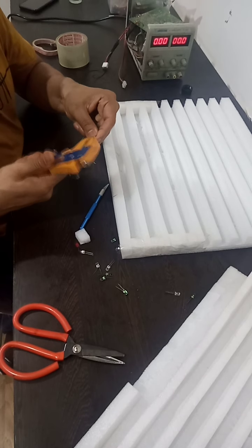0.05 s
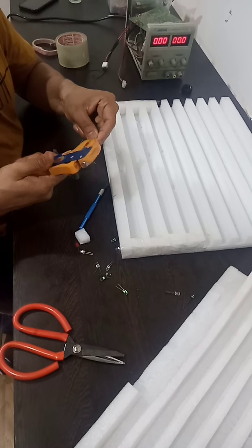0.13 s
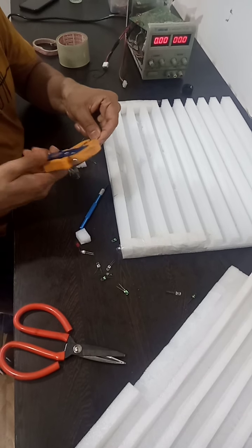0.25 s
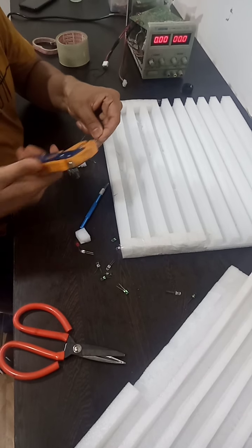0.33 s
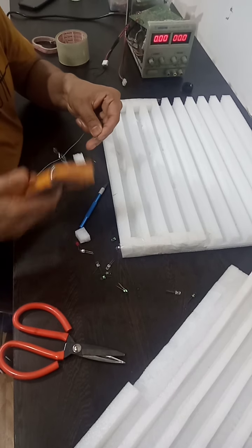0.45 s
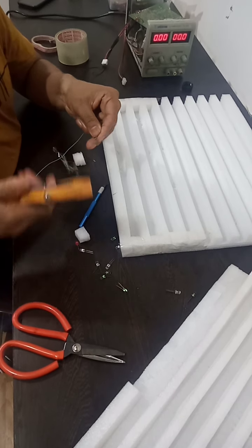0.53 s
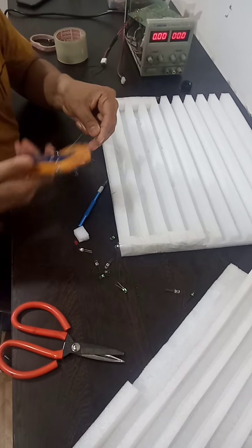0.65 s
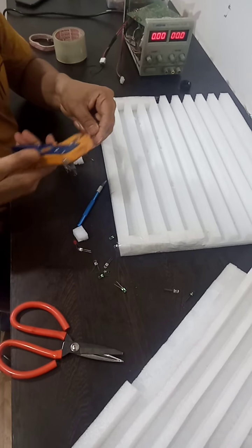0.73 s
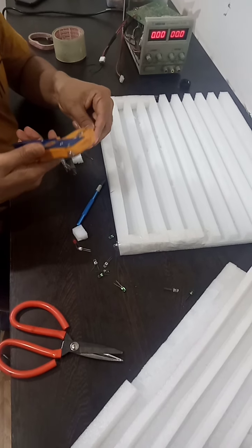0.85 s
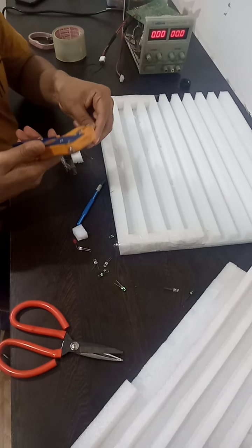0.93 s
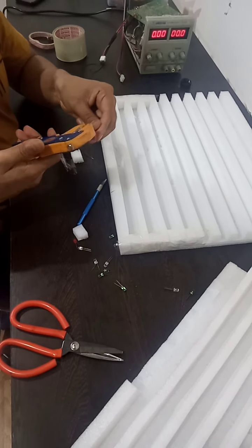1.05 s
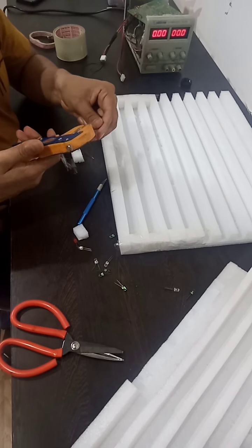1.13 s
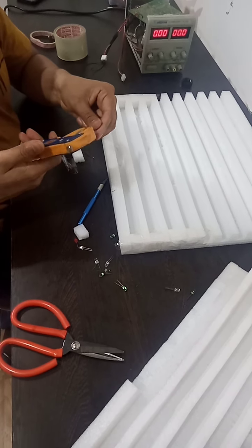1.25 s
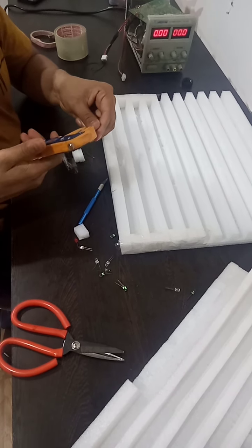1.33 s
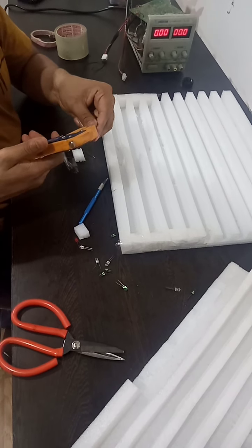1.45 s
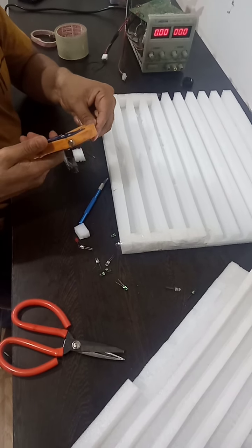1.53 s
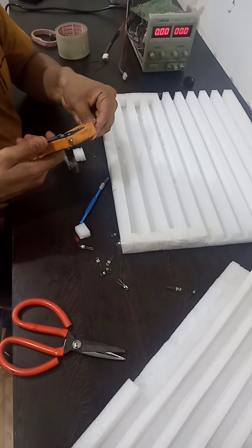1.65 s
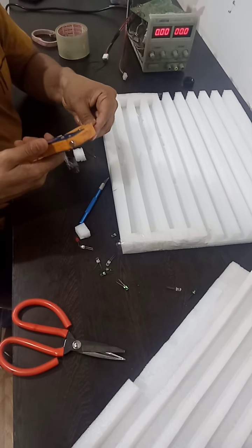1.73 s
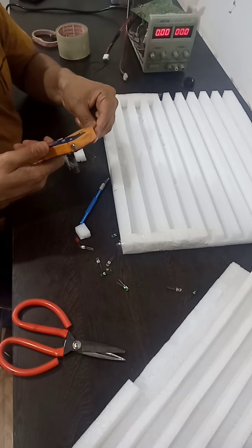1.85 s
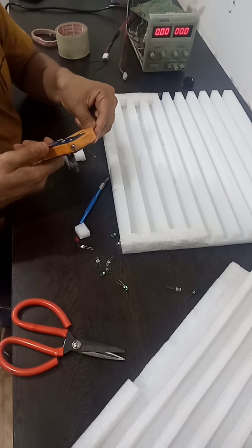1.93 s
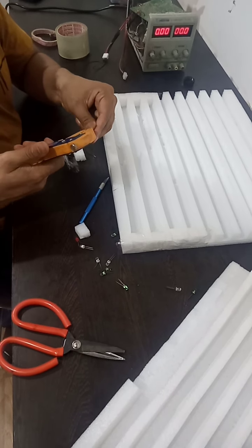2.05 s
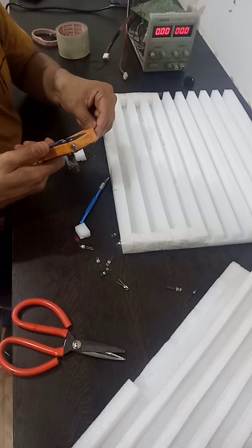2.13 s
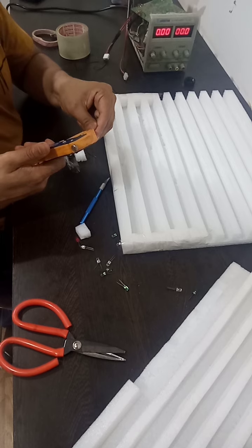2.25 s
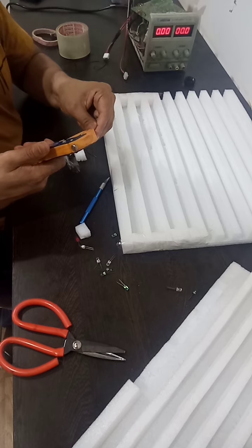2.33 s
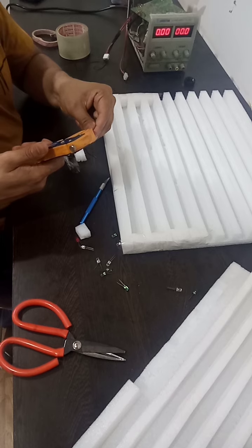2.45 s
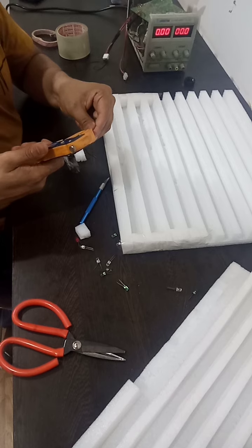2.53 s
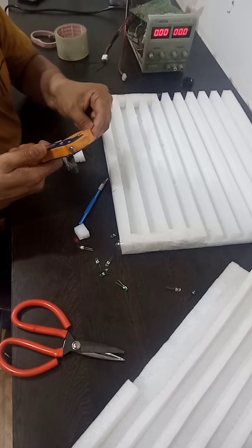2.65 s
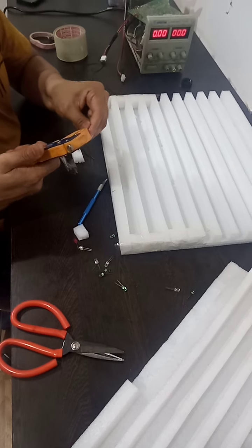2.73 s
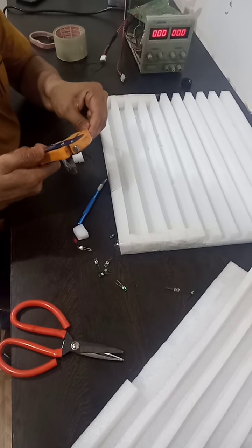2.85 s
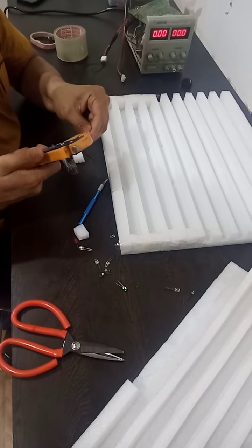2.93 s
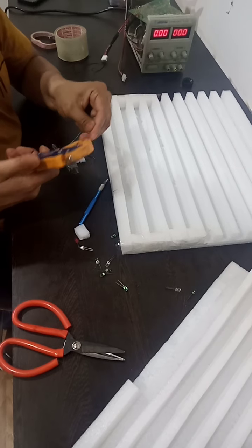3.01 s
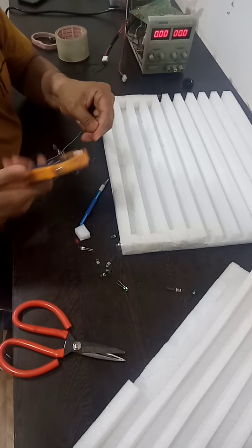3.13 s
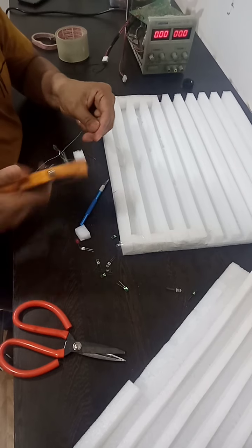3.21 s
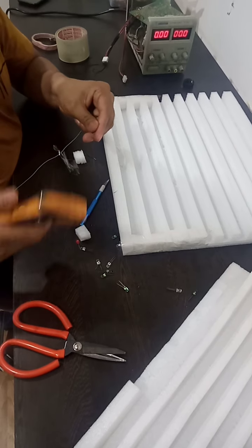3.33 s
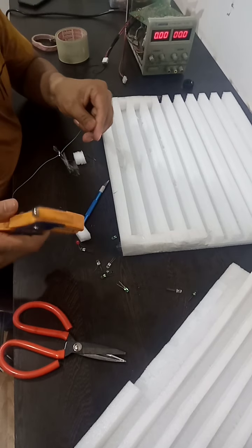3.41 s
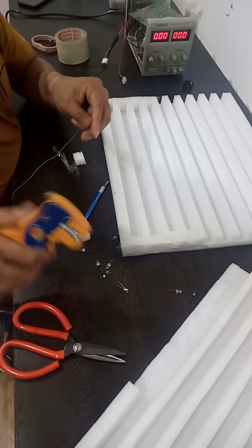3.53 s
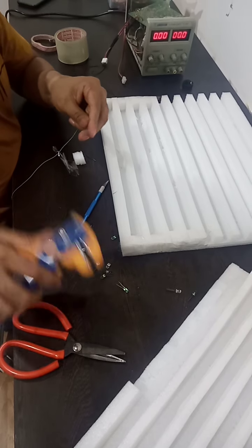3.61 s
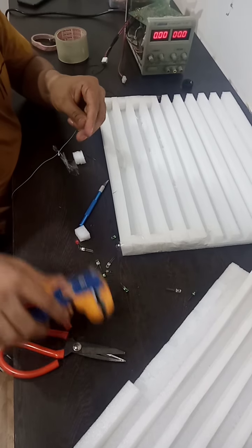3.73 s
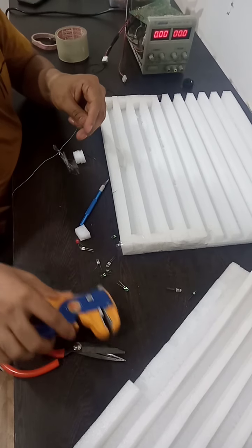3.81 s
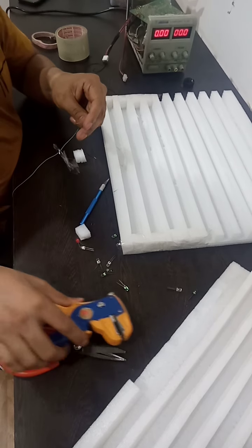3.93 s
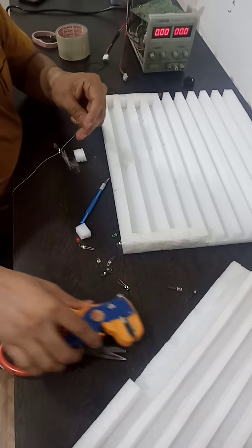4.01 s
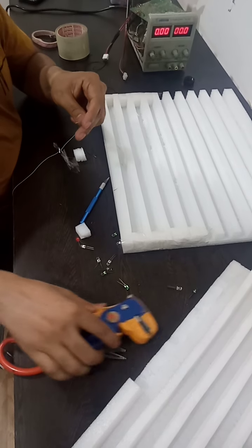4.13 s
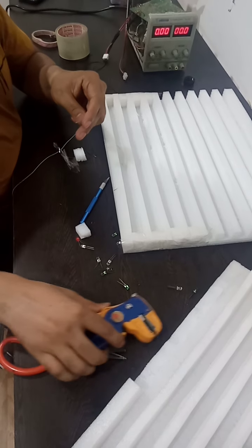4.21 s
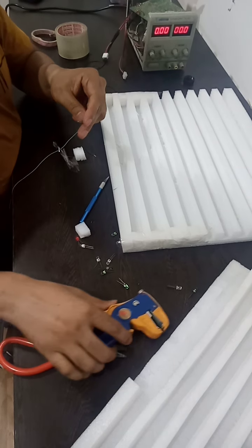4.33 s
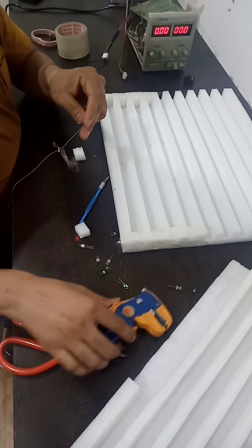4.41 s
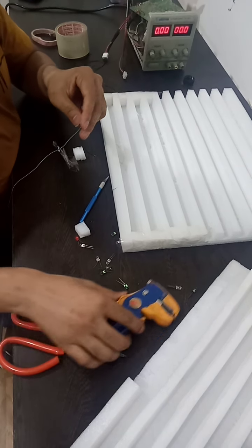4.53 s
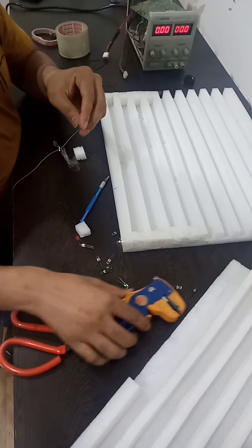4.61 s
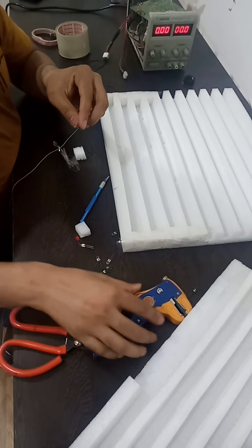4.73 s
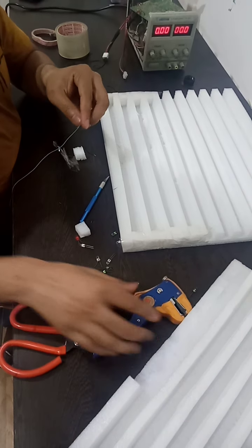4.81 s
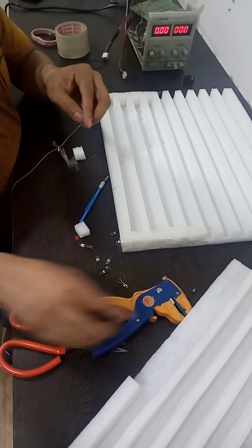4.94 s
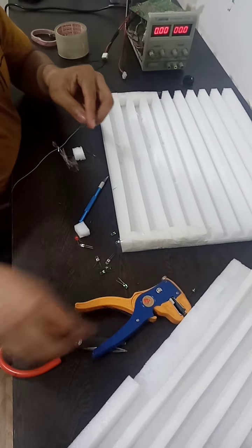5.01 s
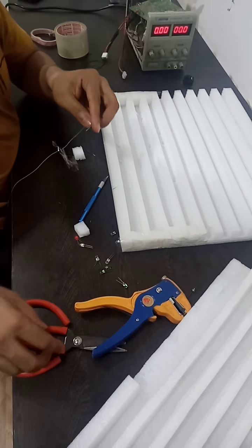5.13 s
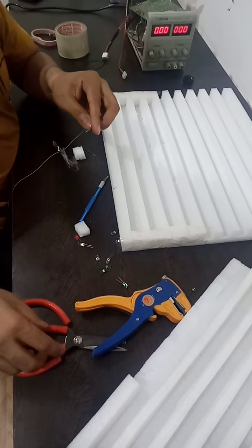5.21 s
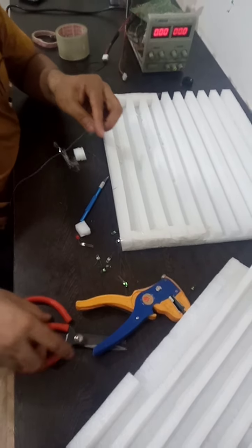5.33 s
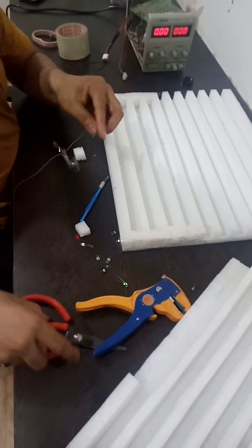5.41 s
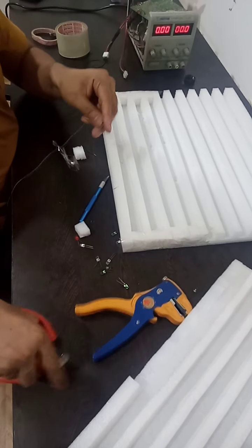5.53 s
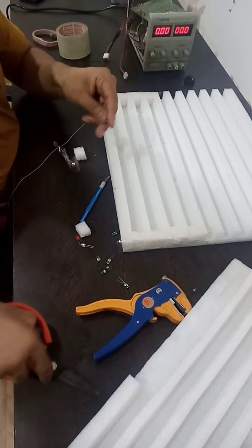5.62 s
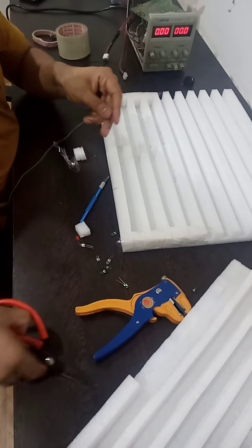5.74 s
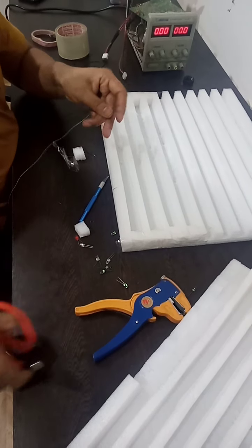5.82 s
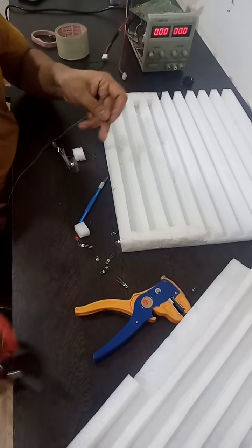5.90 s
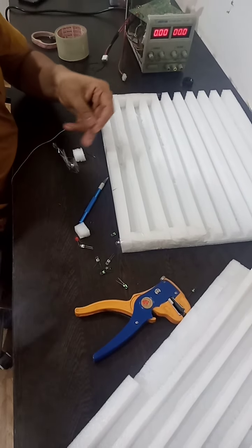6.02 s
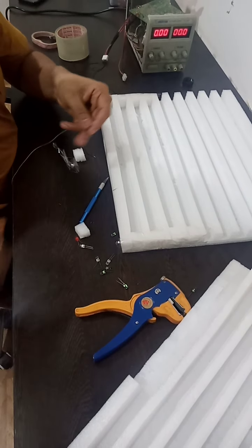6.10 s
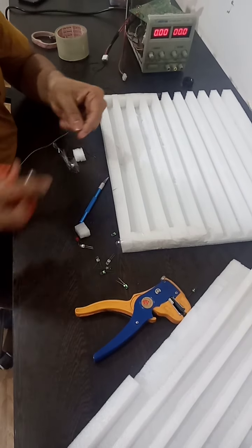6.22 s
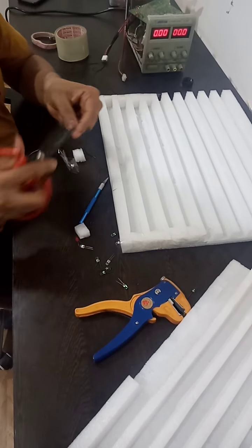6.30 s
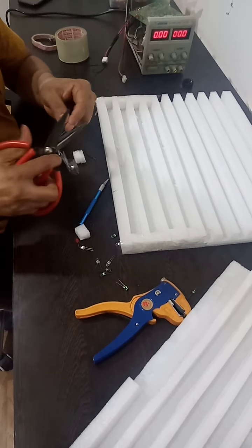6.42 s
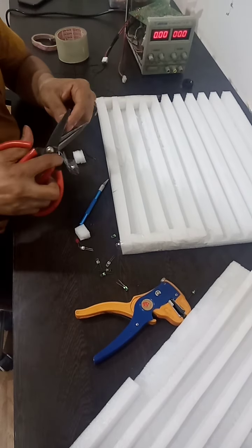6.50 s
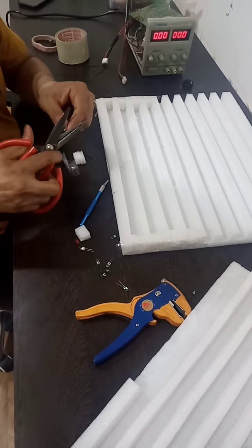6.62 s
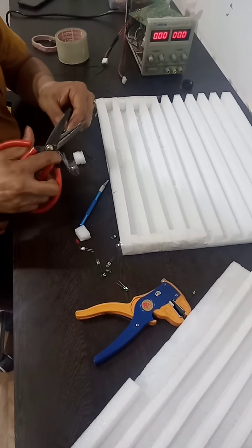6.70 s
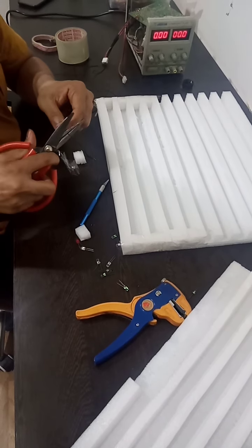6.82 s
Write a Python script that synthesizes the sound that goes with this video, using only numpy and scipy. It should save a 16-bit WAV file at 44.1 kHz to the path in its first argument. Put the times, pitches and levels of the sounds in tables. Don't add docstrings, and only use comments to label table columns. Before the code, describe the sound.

Over low fan hum in an echoing workshop, two sharp plastic snips, a clattering set-down on a hollow tabletop, then scissors dragged and knocked while lifted.

```python
import sys
import numpy as np
from scipy import signal
from scipy.fft import rfft, irfft, next_fast_len
from scipy.io import wavfile
from scipy.ndimage import uniform_filter1d, map_coordinates

SR = 44100
rng = np.random.default_rng(int(sys.argv[2]) if len(sys.argv) > 2 else 0)


def nominal_scale(level):
    x = np.asarray(level, float) / 20
    return 10 ** x


def digitize_waveform(pressure):
    field = np.atleast_2d(pressure).T
    bounded = np.clip(field, -1, 1)
    quanta = np.round(bounded * 32767).astype(np.int16)
    wavfile.write(sys.argv[1], SR, quanta)


N = 302526

# (centre [Hz], width [Hz], level [dB])
FAN_HUM = [(74, 120, -12.5), (137.5, 12, 2), (52.7, 11, -10.5)]
# (centre [Hz], width [Hz], level [dB])
MACHINE_ORDERS = [(717.5, 17.6, 2), (1093, 150, -4.5), (1412, 71, -2.5), (2140, 95, -5), (2760, 20, -6.5)]
# (time [s], whine level [dB])
MACHINE_LOAD = [(0, -54), (.4, -62), (1.45, -58.5), (1.66, -61), (2.03, -59.5), (2.2, -67.5), (2.5, -72.5),
                (2.85, -67), (3.3, -59.5), (3.6, -70), (3.85, -66.5), (4.04, -61.5), (6.86, -63.5)]
# (frequency [Hz], density [dB per Hz])
RUMBLE = [(20, -42.5), (35, -20.5), (100, 3.5), (190, -1), (260, -3.5), (335, 1.5), (420, -10), (500, -4),
          (620, -13), (900, -40), (2000, -53)]
# (frequency [Hz], density [dB per Hz])
RUSH = [(300, -30.5), (600, 1.5), (900, 2.5), (1400, 2), (2000, -1.5), (3000, -5), (4000, -14.5),
        (6000, -30.5), (16000, -36)]
# (time [s], level [dB])
LOW_TONE = [(0, -49), (.1, -44), (.74, -43.5), (1.03, -48.5), (2.48, -43), (2.6, -46), (2.69, -40),
            (2.98, -44), (3.1, -53), (3.25, -43.5), (3.46, -52.5), (3.82, -47), (4.05, -55), (5.14, -37),
            (5.9, -48), (6.1, -38.5), (6.29, -45), (6.42, -52)]
# (time [s], peak level [dB], ring [Hz], edge [dB])
TICKS = [(0.032, -28, 1950, 1), (0.0425, -26.5, 2280, -3), (0.0442, -25.5, 2900, 0), (0.06, -44, 2280, -12),
         (0.2056, -37, 2010, -10), (0.2177, -37, 2080, -18), (2.7846, -34, 3460, -2), (2.785, -36, 1920, 6),
         (2.7912, -29.5, 3540, -21), (2.885, -47, 2000, -14), (3.0031, -40, 1720, -14),
         (3.0039, -40, 3320, -15), (3.014, -50, 3030, 0), (3.019, -37, 2080, -23), (3.492, -53, 3000, 7),
         (3.532, -66, 2140, 1)]
# (time [s], peak level [dB], ring [Hz], edge [dB])
GRIPS = [
    (0.0284, -24, 3870, -17),
    (2.778, -35, 2250, -5),
    (6.306, -42.5, 3600, -11),
]
# (time [s], peak level [dB])
CREEPS = [(0.245, -43.5), (0.29, -59), (0.394, -48), (3.045, -52), (3.12, -48), (3.263, -49)]
# (time [s], peak level [dB])
BITES = [
    (0.4303, -16.5),
    (3.278, -19.5),
]
# (delay [s], level [dB], ring [Hz], edge [dB], room [dB])
BITE_PARTS = [
    (0, -0.5, 4020, -1, 3),
    (.0014, -5, 2200, -21, -3),
    (.002, -13.5, 1390, -17, -7),
]
# (centre [Hz], width [Hz], level [dB])
JAW_EDGE = [(4400, 140, -17.5), (7680, 3070, 6.5), (12360, 12600, 2.5)]
# (time [s], peak level [dB], ring [Hz], edge [dB])
SNAPS = [(0.4301, -14, 3250, -6), (0.4316, -9.5, 3050, -14), (0.4332, -14, 2900, -16),
         (0.4341, -22, 2700, -16), (3.2775, -16, 3300, -6), (3.2781, -16, 3200, -12),
         (3.2795, -17.5, 2900, -14), (3.2806, -15.5, 2500, -16), (3.282, -27, 2400, -16)]
# (time [s], crack peak level [dB], ring [Hz], hardness [dB], thud [Hz])
SET_DOWN = [(4.1319, -12, 2840, -7.5, 139), (4.136, -17.5, 1390, -16, 135), (4.1452, -20, 1075, -24.5, 122),
            (4.26, -41, 1420, -40, 395), (4.351, -40, 1380, -33, 333), (4.474, -34.5, 2220, -6.5, 390),
            (4.66, -15.5, 900, -27, 307), (4.6725, -21.5, 990, -41, 350), (4.696, -10, 1420, -3, 300),
            (4.701, -13, 4400, -15.5, 107), (4.7087, -10, 2500, -8, 650), (4.7216, -16, 1980, -18.5, 203),
            (4.7572, -19, 1190, -27.5, 614), (4.809, -20.5, 2500, -5, 328), (4.8177, -17, 1300, -18, 330),
            (4.8639, -15.5, 1430, -24.5, 590), (4.871, -19, 1900, -17, 345), (4.91, -23, 1100, -44, 540),
            (5.0733, -33.5, 1420, -15, 130)]
# (time [s], crack peak level [dB], hardness [dB], thud [dB], thud [Hz])
PICK_UP = [(5.2877, -31.5, -18, 3, 129), (5.3564, -29, -1.5, 3, 650), (5.3706, -21.5, -2.5, 4, 348),
           (5.3809, -30, -6.5, 14.5, 502), (5.4143, -28.5, -28, 11.5, 130), (5.463, -41, -13, 3, 129),
           (5.5752, -5, -17, 5, 398), (5.576, -20, -18, 12, 151), (5.58, -4, -27, -5, 430),
           (5.592, -8.5, -23, 2, 427), (5.5989, -6.5, -42.5, -8.5, 356), (5.632, -14.5, -42, -2, 301),
           (5.6662, -21.5, -29, -4, 500), (5.69, -17, -30, 6, 296), (5.78, -30, -21, 8, 416),
           (5.9858, -47, -23, 18, 447)]
# (centre [Hz], width [Hz], level [dB])
HARD_EDGE = [(6460, 3100, 6), (12200, 24000, 6.5)]
# (mode [Hz], level [dB], t60 [s])
TABLE_MODES = [(112.4, -3, 0.18), (127.7, 1.5, 0.1), (187, 1, 0.05), (225, -9.5, 0.14), (314.8, -6, 0.58),
               (352, -2.5, 0.45), (358.7, -7.5, 0.33), (403, -4.5, 0.29), (454, -4, 0.16), (546, -5, 0.28),
               (596, -18.5, 0.19), (633, -7, 0.055), (746, -13.5, 0.074), (840, -2, 0.22),
               (1100, 21.5, 0.037), (1420, -3, 0.13)]
# (time [s], speed [dB], weight on the table [dB])
SLIDES = [
    [(4.14, -45, -32.5), (4.25, -47.5, -36.5), (4.35, -56, -41), (4.47, -45, -35), (4.6, -39, -33.5),
     (4.66, -47, -31), (4.72, -28.5, -26), (4.81, -40.5, -35.5), (5.2, -62, -56.5)],
    [(5.29, -59, -49.5), (5.37, -33.5, -37.5), (5.42, -41.5, -26.5), (5.475, -47, -45.5), (5.515, -25, -34),
     (5.57, -25.5, -36), (5.63, -32, -37.5), (5.8, -51.5, -47), (6.3, -64.5, -54)],
]
# (centre [Hz], width [Hz], level [dB])
SHELLS = [
    [(650, 250, -1), (950, 700, 5), (1450, 180, 2.5), (1730, 110, -14), (2140, 720, 2), (2900, 1400, -3),
     (3800, 1700, -7), (7400, 2900, -16)],
    [(900, 850, -1.5), (1790, 110, 3), (2130, 250, 1), (2900, 89, -1.5), (2940, 340, -12.5),
     (3840, 300, -20), (7600, 2900, -14), (13500, 5000, -16.5)],
]
# (mode [Hz], t60 [s])
AIR_MODES = [
    (75, 0.63),
    (128.4, 0.39),
    (185.4, 1.38),
]
# (time of peak [s], level in each of the three modes [dB])
SHOVES = [(4.16, -56, -35.5, -42.5), (4.34, -49, -54, -38), (4.5, -61, -53, -51), (4.57, -62, -48, -29),
          (4.72, -28, -27, -30), (4.85, -57, -32, -48), (5.12, -38, -28, -42.5), (5.39, -31, -54, -35.5),
          (5.45, -48, -25.5, -48), (5.58, -32, -29, -38), (5.63, -56, -19, -31), (5.74, -51, -46, -32),
          (6.02, -51, -35, -34)]
# (frequency [Hz], t60 [s])
ROOM = [(100, 1), (500, 0.99), (2000, 0.81), (4000, 0.67), (7000, 0.46), (14000, 0.39)]
# (frequency [Hz], level [dB])
MICROPHONE = [(20, -6), (60, -5.5), (3200, -0.95), (4000, -5), (4700, -12.5), (5500, -25.5), (6500, -26),
              (8300, -34), (9800, -45.5), (15500, -44.5), (22000, -35.5)]

HUM_DB, RUMBLE_DB, RUSH_DB = -50, -46.5, -53.5
FUZZ_HZ, FUZZ_WIDTH_HZ, FUZZ_DB = 728, 56, 3
LOW_TONE_HZ = 73.1
TICK_MS, TICK_ROOM_DB = 7.7, -5
GRIP_MS, GRIP_ROOM_DB = 12.5, -3
CREEP_HZ, CREEP_MS, CREEP_EDGE_DB, CREEP_ROOM_DB = 3660, 25, -17, 1.5
BITE_MS = 1.03
BLADE_HZ, BLADE_SPREAD = 2230, 0.04
THUD_DB, THUD_PER_CRACK, THUD_PER_HARD = -6.5, -0.42, -0.23
BOOM_DB, RATTLE_DB, BOOM_BY_SPEED = 3.5, -0.5, 0.26
SWELL_S = 0.043
NEAR_WALLS_S = 0.015
HISS_DB = -85.5


def unit(x):
    return x / np.sqrt(np.mean(x ** 2) + 1e-20)


def energy(x):
    return np.linalg.norm(x, axis=1, keepdims=True)


def along(points, hz):
    f, value = np.transpose(points)
    return np.interp(np.log(hz + 1), np.log(f + 1), value)


def curves(rows, outside=None):
    s, *columns = np.transpose(rows)
    return [np.interp(np.arange(N) / SR, s, c, outside, outside) for c in columns]


def wobble(rate):
    knots = rng.standard_normal(int(N * rate / SR) + 4)
    return map_coordinates(knots, [np.arange(N) * rate / SR])


def filtered(x, response):
    length = x.shape[-1]
    m = next_fast_len(min(length + SR, 3 * length))
    return irfft(rfft(x, m) * response(np.fft.rfftfreq(m, 1 / SR)), m)[..., :length]


def resonances(modes, order=1):
    def response(f):
        total = 0
        for k, (centre, width, db) in enumerate(modes):
            damping = 1j * f * width
            total = total + (-1) ** k * nominal_scale(db) * damping / (centre ** 2 - f ** 2 + damping)
        return total ** order
    return response


def noise(response, patchy_db):
    z = signal.stft(rng.standard_normal(N + 512), nperseg=512)[2]
    field = uniform_filter1d(rng.standard_normal(z.shape), size=4, axis=0)
    field = uniform_filter1d(field, size=14, axis=1)
    patchy = signal.istft(z * nominal_scale(patchy_db * unit(field)), nperseg=512)[1][:N]
    return unit(filtered(patchy, response))


def rattles(ms, count):
    fall = nominal_scale(-20 * np.arange(1024) / SR * 1000 / ms)
    push = rng.standard_normal((count, 1024)) * fall
    push[:, 0] = -1
    return push


def smooth_push(push):
    return energy(push) * (np.arange(push.shape[1]) == 0)


def rung(pushes, pitches, sharp, order):
    ring = np.array([filtered(push, resonances([(hz, hz / sharp, 0)], order))
                     for push, hz in zip(pushes, pitches)])
    return ring / np.abs(ring).max(axis=1, keepdims=True)


def placed(rows, sounds, room_db, far=None):
    out = np.zeros((2, N + SR))
    walls = rng.standard_normal((len(rows), 2048)) * np.exp(-np.arange(2048) / SR / NEAR_WALLS_S)
    far = signal.fftconvolve(sounds if far is None else far, walls / energy(walls), axes=1)
    for row, near, sent, db in zip(rows, sounds, far, np.broadcast_to(room_db, len(rows))):
        start = round(row[0] * SR)
        out[0, start:][:len(near)] += nominal_scale(row[1]) * near
        out[1, start:][:len(sent)] += nominal_scale(row[1] + db) * sent
    return out[:, :N]


def air():
    whine_db, = curves(MACHINE_LOAD)
    hum = nominal_scale(HUM_DB + 0.9 * wobble(6.6)) * noise(resonances(FAN_HUM), patchy_db=-0.5)
    rumble = nominal_scale(RUMBLE_DB + 0.6 * wobble(4)) * noise(lambda f: nominal_scale(along(RUMBLE, f)), patchy_db=0.8)
    rush = nominal_scale(RUSH_DB + 0.6 * wobble(3)) * noise(lambda f: nominal_scale(along(RUSH, f)), patchy_db=1.5)
    whine = nominal_scale(whine_db + 5.5 + 0.52 * wobble(2.5)) * noise(resonances(MACHINE_ORDERS, 2), patchy_db=0.8)
    blur = resonances([(FUZZ_HZ, FUZZ_WIDTH_HZ, 0)], 2)
    fuzz = nominal_scale(whine_db + FUZZ_DB) * noise(blur, patchy_db=2.0)
    return hum + rumble + rush + whine + fuzz


def low_tone():
    db, = curves(LOW_TONE)
    phase = 2 * np.pi * LOW_TONE_HZ * np.arange(N) / SR + 0.5 * wobble(15)
    return np.sqrt(2) * nominal_scale(db + 1.1 * wobble(18)) * np.sin(phase)


def jaws():
    # (time s, peak dB, ring Hz, chatter ms, edge dB, room dB)
    ticks = [(s, db, hz, TICK_MS, edge, TICK_ROOM_DB) for s, db, hz, edge in TICKS]
    grips = [(s, db, hz, GRIP_MS, edge, GRIP_ROOM_DB) for s, db, hz, edge in GRIPS]
    creeps = [(s, db, CREEP_HZ, CREEP_MS, CREEP_EDGE_DB, CREEP_ROOM_DB) for s, db in CREEPS]
    bites = [(s + lag, db + part, hz, BITE_MS, edge, wet)
             for s, db in BITES for lag, part, hz, edge, wet in BITE_PARTS]
    rows = np.array(ticks + grips + creeps + bites)
    push = rattles(rows[:, 3:4], count=len(rows))
    pushes = push, smooth_push(push)
    edge, far_edge = [nominal_scale(rows[:, 4:5] + 12.5) * filtered(p, resonances(JAW_EDGE)) for p in pushes]
    ring, far_ring = [rung(p, rows[:, 2], sharp=2.2, order=2) for p in pushes]
    far = far_ring * energy(ring) / energy(far_ring) + far_edge
    return placed(rows, ring + edge, rows[:, 5], far)


def snaps():
    rows = np.array(SNAPS)
    push = np.zeros((len(rows), 1024))
    push[:, 0] = -1
    edge = nominal_scale(rows[:, 3:4] + 32) * filtered(push, resonances(JAW_EDGE))
    ring = rung(push, rows[:, 2], sharp=2.7, order=2)
    room_db = np.where(rows[:, 0] < 1, -7, -8)
    return nominal_scale(1.5) * placed(rows, ring + edge, room_db)


def contacts():
    stripper = [(s, db, hz, hard, THUD_DB + THUD_PER_CRACK * db + THUD_PER_HARD * hard, low)
                for s, db, hz, hard, low in SET_DOWN]
    blades = BLADE_HZ * np.exp(BLADE_SPREAD * rng.standard_normal(len(PICK_UP)))
    scissors = [(s, db, hz, *rest) for (s, db, *rest), hz in zip(PICK_UP, blades)]
    return np.array(stripper + scissors)


def table(force, lo_hz=0, hi_hz=SR):
    modes = []
    for hz, db, t60 in TABLE_MODES:
        if lo_hz < hz < hi_hz:
            width = 4.2 / t60
            modes.append((hz, width, db - 20 * np.log10(width)))
    return filtered(force, resonances(modes))


def knocks():
    rows = contacts()
    push = rattles(9.8, count=len(rows))
    pushes = push, smooth_push(push)
    ring, far_ring = [rung(p, rows[:, 2], sharp=3.33, order=1) for p in pushes]
    edge, far_edge = [nominal_scale(rows[:, 3:4]) * filtered(p, resonances(HARD_EDGE, 2)) for p in pushes]
    far = far_ring * energy(ring) / energy(far_ring) + far_edge
    crack = placed(rows, ring + edge, room_db=-2.0, far=far)
    blow = np.zeros((len(rows), 2048))
    blow[:, :22] = -np.hanning(22)
    thud_ring = rung(blow, rows[:, 5], sharp=2.03, order=2)
    thud = placed(rows, nominal_scale(rows[:, 4:5]) * thud_ring, room_db=-3.0)
    return crack + nominal_scale(-2.5) * thud + nominal_scale(20.5) * table(thud)


def drag():
    slip_now = rng.random(N) < 5000 / SR
    slips = slip_now * nominal_scale(2.77 * rng.exponential(size=N)) * rng.choice([-1, 1], N)
    bumps = nominal_scale(2.7 * wobble(30)) * rng.standard_normal((2, N))
    boom = unit(table(bumps[0], hi_hz=265))
    rattle = unit(table(bumps[1], lo_hz=265, hi_hz=760))
    scrape, shake = np.zeros((2, N))
    for rows, body in zip(SLIDES, SHELLS):
        speed_db, weight_db = curves(rows, -120)
        scrape += nominal_scale(speed_db + 3.1 * wobble(40)) * unit(filtered(slips, resonances(body)))
        boom_db = BOOM_DB + BOOM_BY_SPEED * (speed_db - weight_db)
        shake += nominal_scale(weight_db) * (nominal_scale(boom_db) * boom + nominal_scale(RATTLE_DB) * rattle)
    return np.array([scrape + shake, nominal_scale(4.0) * scrape + nominal_scale(-1.5) * shake])


def hollow():
    t, rows, out = np.arange(N) / SR, np.array(SHOVES), 0
    late = t - rows[:, :1]
    rise = np.clip(1 + late / SWELL_S, 0, 1)
    for (hz, t60), db in zip(AIR_MODES, rows[:, 1:].T):
        swells = rise * nominal_scale(db[:, None] - 60 * np.maximum(late, 0) / t60)
        level = np.linalg.norm(swells, axis=0)
        note = np.sin(2 * np.pi * hz * t + 0.66 * wobble(4.5))
        out = out + np.sqrt(2) * level * nominal_scale(0.24 * wobble(60)) * note
    return out


def room(x, build=0.0005):
    step = SR // 5
    blocks = np.pad(x, (0, -N % step)).reshape(-1, step)
    hz, t, z = signal.stft(rng.standard_normal((len(blocks), SR)), SR, nperseg=256)
    decay = nominal_scale(-60 * t / along(ROOM, hz)[:, None])
    tails = signal.istft(z * decay, SR, nperseg=256)[1][:, :SR]
    tails *= 1 - np.exp(-np.arange(SR) / SR / build)
    wet = signal.fftconvolve(blocks, tails / energy(tails), axes=1)
    out = np.zeros(N + 2 * SR)
    for k, piece in enumerate(wet):
        out[k * step:][:len(piece)] += piece
    return out[:N]


def scene():
    direct, sent = jaws() + snaps() + knocks() + drag()
    return (air() + low_tone() + direct + room(sent) + hollow())[None]


def roll_off(x):
    return signal.sosfilt(signal.butter(12, 15750, fs=SR, output="sos"), x)


def record(dry):
    cepstrum = irfft(np.log(nominal_scale(along(MICROPHONE, np.fft.rfftfreq(8192, 1 / SR)))))
    cepstrum[1:4096] *= 2
    cepstrum[4097:] = 0
    impulse = irfft(np.exp(rfft(cepstrum)))
    heard = signal.fftconvolve(dry, impulse[None], axes=1)[:, :N]
    heard = heard / (1 + np.abs(heard / 0.95) ** 6) ** (1 / 6)
    hiss = nominal_scale(HISS_DB) * rng.standard_normal(dry.shape)
    return roll_off(heard + hiss)


dry = scene()
out = record(dry)
digitize_waveform(out)
```